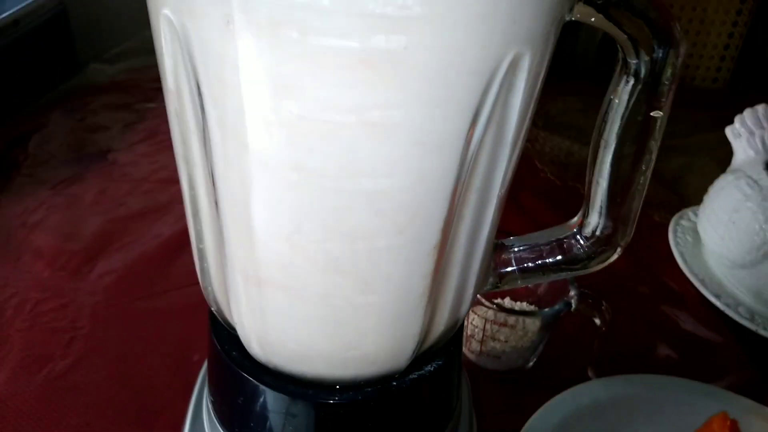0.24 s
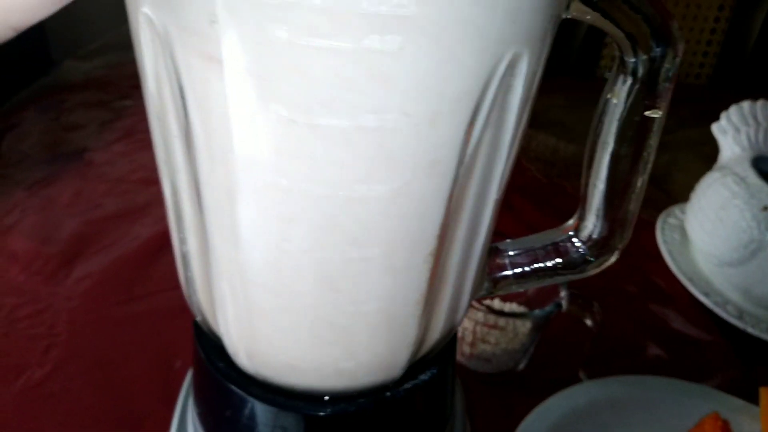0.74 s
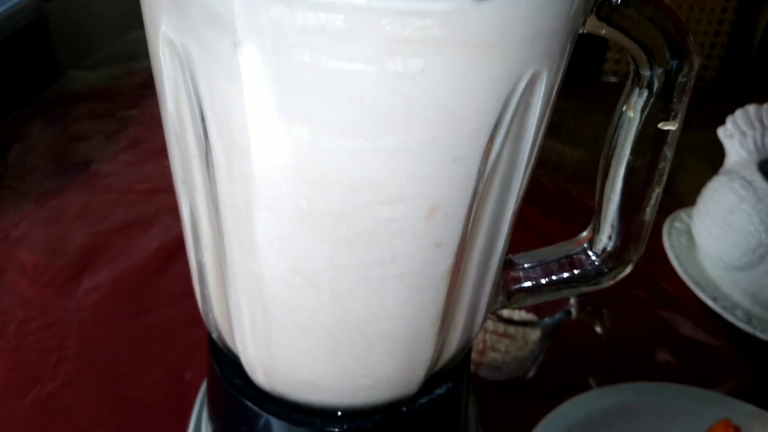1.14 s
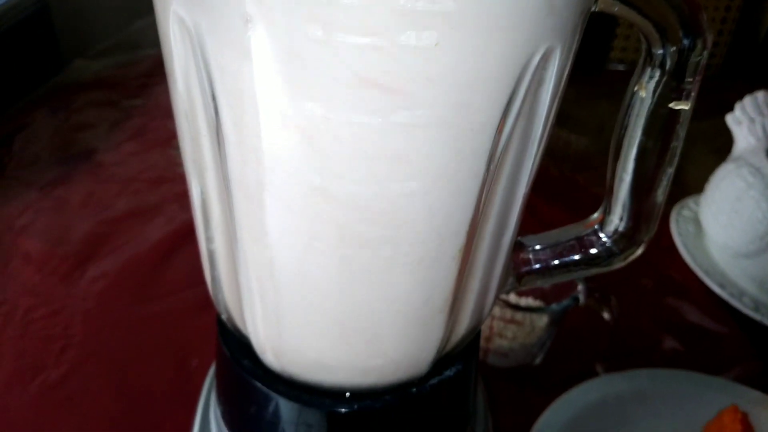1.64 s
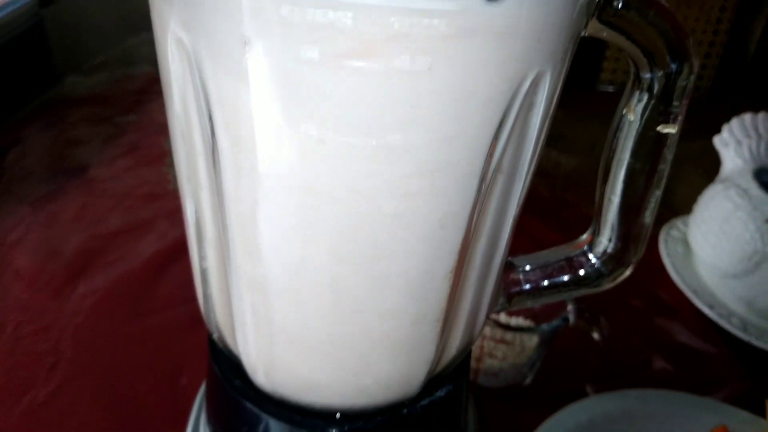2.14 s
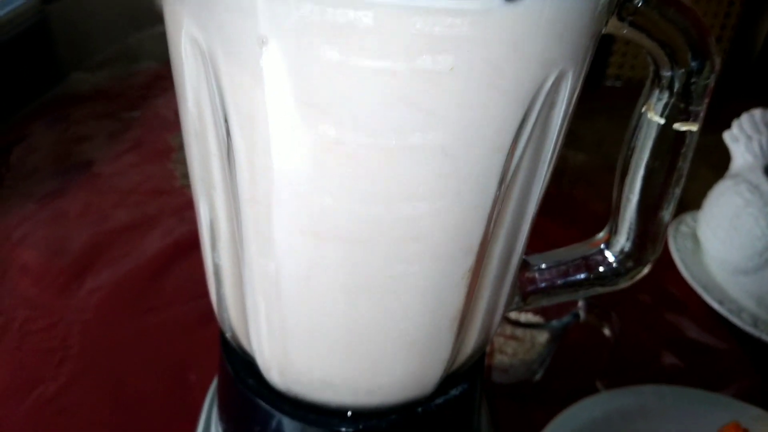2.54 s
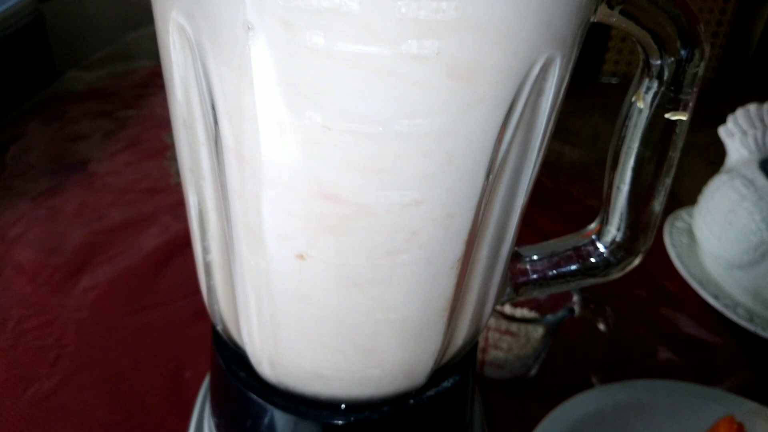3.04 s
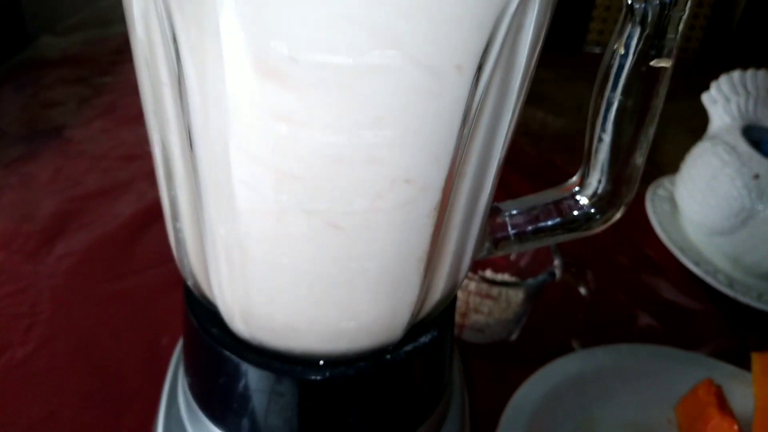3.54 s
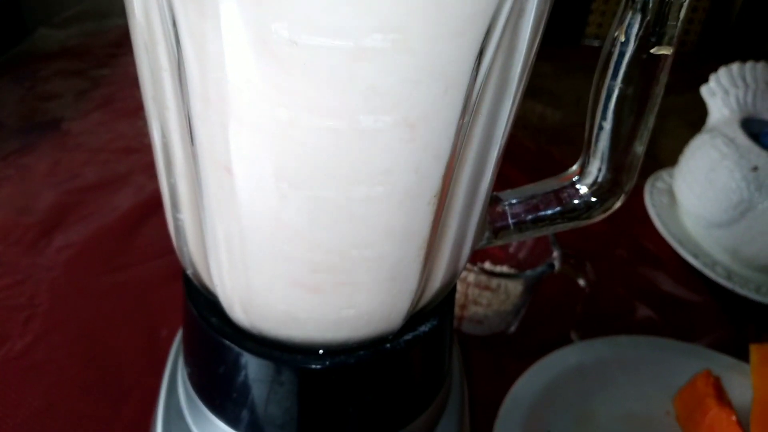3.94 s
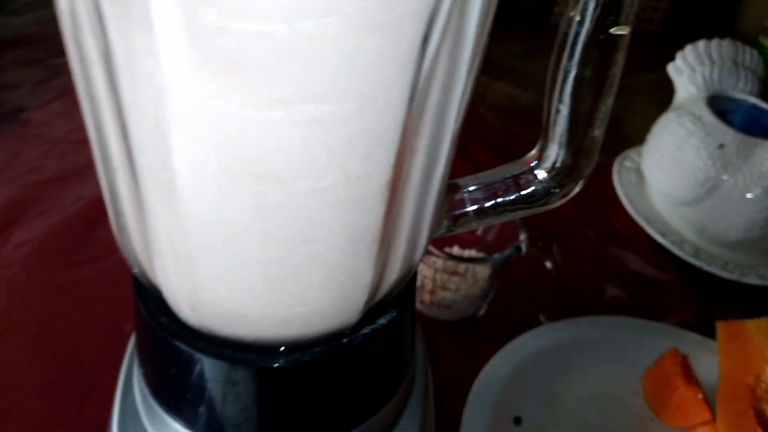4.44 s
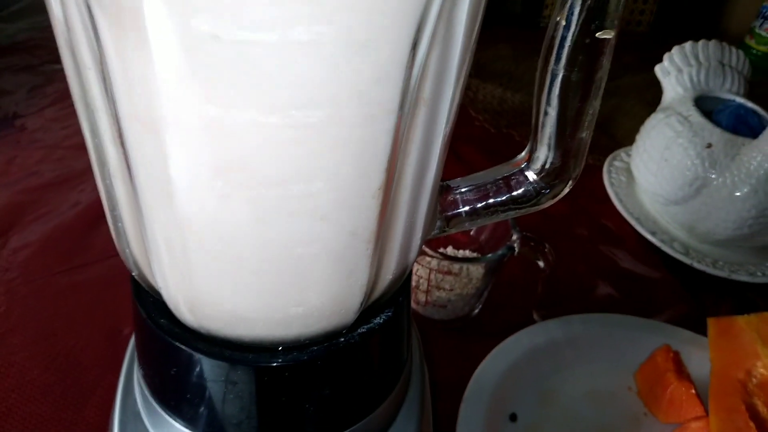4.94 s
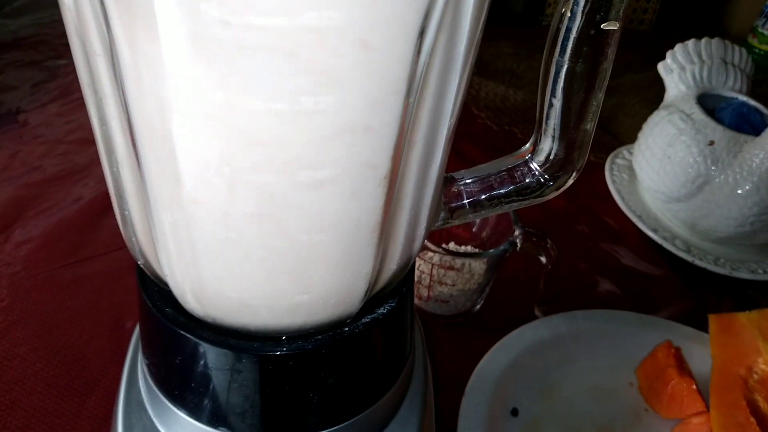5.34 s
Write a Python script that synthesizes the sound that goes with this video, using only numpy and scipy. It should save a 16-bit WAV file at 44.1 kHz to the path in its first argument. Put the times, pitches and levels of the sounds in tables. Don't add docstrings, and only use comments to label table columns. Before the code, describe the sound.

A blender with a thick glass jar, heard in stereo at close range with a short hard-walled room tail. It opens loud and rattling, ice crunching and the lid knocking left. After about one second it settles into bright hissing grind, a low motor hum that sags and recovers under load, low table rumble, wet gulps and isolated sharp cracks.

```python
import sys
import numpy as np
from scipy import signal
from scipy.fft import rfft, irfft, next_fast_len
from scipy.io import wavfile
from scipy.ndimage import uniform_filter1d

SR = 44100
rng = np.random.default_rng(int(sys.argv[2]) if len(sys.argv) > 2 else 0)


def convert_level_to_amplitude(level_db):
    exponent = np.asarray(level_db, float) / 20
    return 10 ** exponent


def int16_out(signal):
    q = np.round(np.clip(np.atleast_2d(signal).T, -1, 1) * 32767)
    wavfile.write(sys.argv[1], SR, q.astype(np.int16))


N = 246519
TIME = np.arange(N) / SR
HZ = np.fft.rfftfreq(2 * next_fast_len(N // 2 + SR // 20), 1 / SR)
SIDES = np.array([[.5], [-.5]])
LEFT_LAG_S = 0.00013
MAINS_BUZZ_HZ = 120

# t/s, shaft speed f/Hz, hum level/dB
MOTOR = [(0.0, 195.8, -48.5), (0.97, 194.9, -53), (1.07, 199.9, -52), (1.45, 200.5, -44), (2.0, 202.8, -45),
         (2.32, 204.6, -41.5), (2.42, 201.4, -35.5), (2.52, 199.2, -49), (2.9, 199.3, -49),
         (3.3, 203.3, -44), (3.95, 204.2, -45), (4.1, 202.7, -45.5), (4.4, 201.1, -46.5),
         (4.5, 200.3, -45.5), (5.05, 201.6, -46.5), (5.17, 204.8, -45), (5.25, 200.5, -44),
         (5.59, 202.6, -49)]


def level(x, db):
    return x * convert_level_to_amplitude(db) / np.sqrt(np.mean(x ** 2))


def along(rows, column=1):
    rows = np.array(rows, float)
    return np.interp(TIME, rows[:, 0], rows[:, column])


def on_hz(points, column=1):
    points = np.array(points, float)
    return np.interp(np.log(HZ + 1), np.log(points[:, 0]), points[:, column])


def walk(rate):
    hold = int(SR / rate)
    steps = np.repeat(rng.standard_normal(N // hold + 1), hold)[:N]
    return 1.64 * uniform_filter1d(uniform_filter1d(steps, hold), hold)


def above(hz):
    return 1 / np.sqrt(1 + (hz / (HZ + 1)) ** 16)


def below(hz):
    return np.sqrt(1 - above(hz) ** 2)


def bell(hz, width_hz):
    return 1 / (1 + 1j * (HZ ** 2 - hz ** 2) / (HZ + 1) / width_hz)


def bells(modes):
    return np.sqrt(sum(convert_level_to_amplitude(db) ** 2 * abs(bell(hz, width)) ** 4 for hz, width, db in modes))


def ports(envelope, colour, clicks=0):
    # f/Hz, share/0-1
    likeness = [(100, 0.78), (300, 0.84), (900, 0.88), (1600, 0.55), (3000, 0.6), (6300, 0.1), (7600, 0.94),
                (10500, 1), (15000, 0.72)]
    size = 2 * (len(HZ) - 1)
    shared, left, right = rfft(envelope * rng.standard_normal((3, N)) + 1.02 * clicks, size)
    alike = np.clip(on_hz(likeness), 0, 1)
    lag = np.exp(-2j * np.pi * HZ * LEFT_LAG_S * below(6600))
    left = (np.sqrt(alike) * shared + np.sqrt(1 - alike) * left) * lag
    right = np.sqrt(alike) * shared + np.sqrt(1 - alike) * right
    colour = colour / np.sqrt(np.mean(abs(colour) ** 2))
    return irfft(np.array([left, right]) * colour, size)[:, :N]


def clogging(column):
    # t/s at the worst, sag f/Hz, build-up t/s, hum loss level/dB
    clogs = [(0.36, 3.06, 0.077, 10), (0.46, 4.5, 0.12, 3.5), (0.55, 2.03, 0.088, 8), (0.9, 0.3, 0.1, 8),
             (1.3, 3.96, 0.19, 9.5), (1.64, 6.74, 0.14, 14), (1.92, 2.12, 0.08, 1), (2.16, 4.64, 0.15, 4),
             (2.7, 2.94, 0.1193, 3.5), (3.13, 4.96, 0.21, 6), (3.65, 5.4, 0.29, 3.5), (4.73, 1.84, 0.21, 2),
             (5.4, 4.25, 0.13, 3)]
    clears_s = 0.12
    return sum(np.interp(TIME, [row[0] - row[2], row[0], row[0] + clears_s], [0, row[column], 0])
               for row in clogs)


def shaft_speed():
    return along(MOTOR) - clogging(column=1)


def shaft_hum(hz, turn):
    # multiple of the shaft speed, level/dB under the usual hum
    orders = [(2, -18.5), (3, -15.5), (5, -19.5), (6, -14.5)]
    hum_db = along(MOTOR, column=2) - clogging(column=3)
    loudness = convert_level_to_amplitude(hum_db + 3.5 + 0.88 * walk(40) + 4.0 * walk(2.94) * SIDES)
    hum = loudness * np.sin(turn + (.5 + 0.3 * walk(3.72)) * SIDES)
    for order, db in orders:
        overtone = convert_level_to_amplitude(-44.5 + db + 1.0 * (hz - 200.0) + 0.92 * walk(5))
        hum = hum + overtone * np.sin(order * turn - 0.38 * SIDES)
    return hum


def squeal():
    # t/s, length t/s, level/dB
    start, length, db = (.445, .044, -34)
    gate = uniform_filter1d(1. * (abs(TIME - start - length / 2) < length / 2), size=200)
    end = start + length
    gate = np.maximum(gate, .4 * np.exp(-abs(TIME - end) / .08) * (TIME > end))
    return gate * convert_level_to_amplitude(db + np.array([[0], [-14]]))


def armature_whine(hz, turn):
    best_hz, fall_db_per_hz2 = 198.5, 0.17
    whine_db = np.maximum(-49.5 - fall_db_per_hz2 * (hz - best_hz) ** 2, -57)
    whine = convert_level_to_amplitude(whine_db + 6 + 1.2 * walk(26) + 3.7 * SIDES) + squeal()
    slots = 12 * turn - 1.6 * SIDES
    shadow = convert_level_to_amplitude(-11) * np.sin(slots - 2 * np.pi * MAINS_BUZZ_HZ * TIME)
    return whine * (np.sin(slots) + shadow)


def motor():
    hz = shaft_speed()
    turn = 2 * np.pi * np.cumsum(hz * (1 + .001 * walk(40))) / SR
    return shaft_hum(hz, turn) + armature_whine(hz, turn)


def table():
    # t/s, level/dB
    rocking = [
        (0.0, 3),
        (0.5, -2),
        (0.95, 8),
        (1.1, 0),
        (1.55, -2),
        (1.8, 4),
        (2.2, 6.5),
        (2.5, -1.5),
        (5.59, -3.5),
    ]
    # f/Hz, level/dB
    rumble_colour = [(33, -46), (45, -13), (85, -2.5), (135, -12.5), (170, -5.5), (230, -47)]
    # f/Hz, level/dB
    pulp_colour = [(130, -20), (200, -4), (290, 1.5), (400, -7), (540, -15), (700, -28)]
    rocking_db = along(rocking)
    both = np.ones((2, 1))
    rumble = convert_level_to_amplitude(-65 + rocking_db + 1.4 * walk(5.96))
    gurgle = convert_level_to_amplitude(-52.5 + 0.25 * rocking_db + 1.66 * walk(24.61))
    return ports(rumble, convert_level_to_amplitude(on_hz(rumble_colour)) * both) + ports(gurgle, convert_level_to_amplitude(on_hz(pulp_colour)) * both)


def gulps():
    # t/s, peak level/dB, pitch f/Hz
    pockets = [(0.113, -28.5, 364), (0.356, -50, 253), (0.492, -23.5, 363), (0.924, -47, 266),
               (1.077, -45, 300), (1.248, -29, 281.7), (1.301, -29.5, 354), (1.432, -30, 260),
               (1.5, -30, 280), (1.57, -31, 276), (1.76, -33, 240), (2.19, -27, 295), (2.336, -21.5, 293.3),
               (2.416, -28, 240), (2.737, -55, 294), (3.851, -47, 223.6), (4.202, -33, 231.5)]
    out = np.zeros((2, N))
    t = TIME[:SR // 10]
    for start, db, hz in pockets:
        i = int(start * SR)
        pitch = .85 * hz * (1 + 7.7 * t)
        swell = (t / 0.01) * np.exp(1 - t / 0.0062)
        gulp = convert_level_to_amplitude(db - 7.0) * np.sin(2 * np.pi * pitch * t) * swell
        out[:, i:i + len(t)] += gulp[:N - i]
    return out


def grit(rate, spread_db, tail_ms, bed):
    sizes = convert_level_to_amplitude(spread_db * np.minimum(rng.exponential(size=N), 3))
    ticks = (rng.random(N) < rate / SR) * sizes
    ticks = signal.lfilter([1], [1, -np.exp(-1000 / (tail_ms * SR))], ticks)
    return level(bed + level(ticks, 0), 0)


def crunches(rows, tail_ms, after_db, after_ms):
    power = np.zeros(N)
    for s, held_ms, db in rows:
        start = int(s * SR)
        ms = 1000 * TIME[:min(N - start, SR // 4)]
        late = np.maximum(ms - held_ms, 0)
        fall_ms = tail_ms * np.clip(held_ms / 8, .4, 1)
        shape = np.exp(-late / fall_ms) ** 2 + (convert_level_to_amplitude(after_db) * np.exp(-late / after_ms)) ** 2
        shape += (convert_level_to_amplitude(-7) * np.exp(-ms / 3.0)) ** 2
        power[start:start + len(ms)] += convert_level_to_amplitude(db) ** 2 * shape * np.minimum(ms / 2.9, 1) ** 2
    return np.sqrt(power)


def accents(rows, boost, rise_ms, fall_ms):
    power = np.ones(N)
    lead_s = .003
    ms = 1000 * (TIME[:SR // 100] - lead_s)
    shape = np.where(ms < 0, np.exp(-(ms / rise_ms) ** 2), np.exp(-ms / fall_ms))
    for s, db in rows:
        start = int((s - lead_s) * SR)
        power[start:start + len(ms)] += convert_level_to_amplitude(db + boost) ** 2 * shape
    return np.sqrt(power / uniform_filter1d(power, size=SR // 40))


def colours(column):
    # f/Hz, left level/dB, right level/dB
    jar_colour = [(540, -4.5, -5.5), (850, 2, 3), (1705, 3.5, 6.5), (2000, 1, -2), (3140, 6, 4.5),
                  (3970, 4.5, -3), (5470, -3.5, 3), (6570, 14, 9.5), (7800, 12, 11), (10680, 8.5, 12.5),
                  (11470, 2, -6.5), (12400, -3.5, 5), (16400, -10, -12)]
    # f/Hz, width f/Hz, grinding level/dB, struck level/dB
    glass_modes = [(874, 250, 0.5, 2), (1003, 29, 5, 7), (1665, 310, 3, 3.5), (2370, 160, -1, 5.5),
                   (3250, 190, 1.5, 6), (3563, 71, -1, 9.5), (4150, 310, 3.5, 6), (8045, 1240, 6.5, 13),
                   (9010, 1100, 4, 7)]
    # f/Hz, width f/Hz, level/dB
    lid_modes = [(5250, 660, 3.5), (5870, 570, 1.5), (7130, 820, -10)]
    glass = convert_level_to_amplitude(sum(mode[column] * abs(bell(*mode[:2])) ** 2 for mode in glass_modes))
    jar = convert_level_to_amplitude(np.array([on_hz(jar_colour, column=1), on_hz(jar_colour, column=2)])) * glass
    body = jar * above(404) * below(1980)
    wall = jar * above(2100) * below(4900)
    lid = bells(lid_modes) * above(4910) ** 2 * convert_level_to_amplitude(np.array([[0], [-24]]))
    fizz = jar * above(4800) * below(14000)
    return body, wall, lid, fizz, jar * above(11200)


def collar(surge, chatter, blades):
    # f/Hz, width f/Hz, level/dB
    collar_modes = [(4540, 390, -3), (4775, 560, 5)]
    buzz = convert_level_to_amplitude(-39.5) * convert_level_to_amplitude(.8 * surge) * chatter * blades
    return ports(buzz, bells(collar_modes) * convert_level_to_amplitude(np.array([[0], [-22]])))


def blows():
    # t/s, crunch length t/ms, level/dB,
    # bulk level/dB, brittleness level/dB
    ice = [(0.062, 26, -37.5, -3, 19.5), (0.0986, 25, -35.5, -6.5, 14.5), (0.121, 13, -33, -6, 10.5),
           (0.143, 5.2, -31.5, -10, -1), (0.215, 7.5, -33.5, -7.5, -5), (0.2423, 2.6, -34.5, -4, -4),
           (0.348, 12, -40, -19, 6), (0.378, 20, -46, -17, 11.5), (0.4848, 17, -37.5, -8, 15),
           (0.5691, 10.5, -40.5, -20, 3), (0.595, 7.4, -39, -3.5, 17.5), (0.614, 6.6, -38.5, -2.5, 12),
           (0.682, 13, -48, -7, 9), (0.755, 8.1, -33.5, -10, 1), (0.823, 21.5, -35, -9.5, 6.5),
           (0.8864, 9.9, -41, -4, 8.5), (0.906, 3.3, -33, -9.5, 7), (0.911, 7.3, -29, -8.5, 6),
           (0.966, 16, -31, -8, 5), (1.234, 25.3, -40, -3, 15), (1.6322, 15, -29.5, -3, 11),
           (1.652, 20, -46, -1, 17),
           (1.7529, 14, -49, -9, 10), (1.803, 4.5, -55, -1, 18.5), (1.908, 7.5, -42.5, -2, 5),
              (2.142, 17.3, -47, 1, 13), (2.389, 10, -47.5, 3, 0), (2.4254, 11, -38, -7, 5),
              (2.4862, 5.6, -34.5, -17, -10), (2.6722, 7.5, -42.5, -1, 0), (2.9524, 4.5, -42.5, 1, 14),
              (3.357, 18.7, -41.5, -2, 2), (3.385, 6.7, -35.5, 1, 9), (3.405, 18, -42, -8, 3),
              (3.52, 8.8, -41, -21, 5.5), (3.88, 4.5, -41, 1.5, 8.5), (4.098, 6.3, -36.5, 1, 1),
              (4.3707, 4.6, -30.5, -1, 4.5), (4.5781, 5.4, -40.5, -8, 7.5), (4.705, 3.44, -37.5, -3, 1),
              (4.824, 6.7, -39.5, -2, 12.5), (4.839, 4, -40, -3, 8), (4.912, 2.4, -35.5, -13, 7),
              (4.965, 20, -43, -1.5, 7.5), (5.1697, 5.15, -43.5, -6.5, 8), (5.39, 3.2, -41, -7, 2)]
    # t/s, length t/ms, level/dB
    knocks = [(0.0622, 16, -19.5), (0.1002, 23.5, -19), (0.126, 10, -18), (0.14, 2.5, -24),
              (0.155, 1.5, -15), (0.242, 2.8, -22), (0.268, 19, -22.5), (0.3042, 3.5, -27), (0.34, 15, -18),
              (0.375, 2, -11), (0.395, 12, -24), (0.436, 18, -24), (0.483, 14, -12), (0.5691, 9.6, -26),
              (0.595, 10, -15), (0.613, 6.1, -12.5), (0.681, 13, -24.5), (0.722, 31, -28.5),
              (0.745, 13, -18.5), (0.757, 4.6, -13), (0.82, 21, -24), (1.803, 4.5, -36), (1.9848, 3, -35),
              (2.024, 6.5, -29.5), (2.363, 4.7, -29.5), (3.132, 8.7, -30.5), (3.244, 9.2, -29.5),
              (3.7065, 5, -38), (4.027, 5, -28.5), (4.2096, 8.4, -28), (4.7049, 3.35, -27),
              (4.9126, 2.4, -21.5)]
    s, ms, db, bulk_db, brittle_db = np.transpose(ice)
    body = np.transpose([s, ms, db + bulk_db])
    wall = np.transpose([s, ms, db])
    lid = np.transpose([s, ms, db + brittle_db - 1])
    fizz = np.transpose([s, ms, db + brittle_db])
    return body, wall, np.vstack([lid, knocks]), fizz


def tapped(chatter):
    # t/s, level/dB over the chatter
    rim_taps = [(0.0656, 4.7), (0.0718, 0), (0.077, 9), (0.0846, 2.1), (0.096, 2.1), (0.1084, 1),
                (0.1291, 1), (0.1413, 4.3), (0.1471, 8), (0.1572, 11), (0.1616, 6), (0.1756, 4.1),
                (0.1859, 4), (0.192, 5.1), (0.2033, 1), (0.2441, 6.5), (0.2533, 4.1), (0.273, 4.0),
                (0.2792, 3.9), (0.2844, -1), (0.2954, 1), (0.3058, 5.1), (0.3203, -2), (0.3254, 2.9),
                (0.3346, 2.6), (0.3423, 3.7), (0.3512, 3.8), (0.3637, 1), (0.3791, 8.5), (0.3929, 1.6),
                (0.4047, 5.3), (0.4099, 1.6), (0.4253, 4.6), (0.4399, 4.6), (0.4528, 6), (0.4862, 6),
                (0.4898, 3.4), (0.4946, -1), (0.4993, 3.5), (0.5163, 1), (0.5246, -1), (0.5342, 4.9),
                (0.5706, 8), (0.5783, 5.4), (0.6011, 3.5), (0.6178, 10.5), (0.6296, 2.9), (0.6448, 3.8),
                (0.6706, 9), (0.6857, 2.3), (0.6944, 3.5), (0.727, 3.8), (0.7447, 5), (0.7555, 6),
                (0.7626, 4), (0.7886, 9), (0.8267, 3.2), (0.8336, 2), (0.9186, 3), (0.9723, 6),
                (1.11, 6.8), (1.1428, 6.5), (1.158, 6.8), (1.2367, 2), (1.2404, 3.2), (1.2528, 2.9),
                 (1.2625, 4.4), (1.344, 6.1), (1.55, 6.6), (1.561, 5.5), (1.587, 5.5), (1.637, 5.2),
                 (1.6426, 3.2), (1.6445, 2.2), (1.653, 3.6), (1.6707, 5.6), (1.7545, 8.2), (1.7872, 5.6),
                 (1.806, 6.5), (2.0266, 4.9), (2.0684, 7.5), (2.2488, 8.1), (2.367, 5.3), (2.3918, 5.6),
                 (2.6739, 7), (2.7929, 6.6), (2.9554, 6.8), (3.0728, 6.9), (3.139, 5.4), (3.1915, 7.1),
                 (3.2582, 5.8), (3.3874, 5.7), (3.4105, 6.8), (3.883, 6.0), (4.0329, 5.6), (4.213, 4.6),
                 (4.2181, 4.4), (4.2604, 4.7), (4.3073, 7.8), (4.3766, 5.8), (4.4142, 5.4), (4.7083, 6.3),
                 (4.7864, 6.6), (4.828, 4.4), (4.9163, 6.6), (4.9761, 6.6), (5.014, 10.4), (5.1532, 6),
                 (5.1728, 5.3), (5.3926, 7.1)]
    s, db = np.transpose(rim_taps)
    tap_ms = 0.89
    clicks = np.zeros(N)
    clicks[(s * SR).astype(int)] = convert_level_to_amplitude(db) * np.sqrt(tap_ms * SR / 1000)
    thin = np.sqrt(np.clip(1 - uniform_filter1d(clicks ** 2, size=SR // 50), .15, 1))
    around = np.sqrt(np.maximum(uniform_filter1d(chatter ** 2, size=SR // 50), 0))
    return clicks * around, thin


def grind(db, surge):
    return convert_level_to_amplitude(db + 1.06 * surge + 0.97 * walk(16))


def smash(rows, db):
    return convert_level_to_amplitude(db) * crunches(rows, tail_ms=8.3, after_db=-8.5, after_ms=40)


def air(surge, fizz_blows, splinters, shards):
    # t/s, peak level/dB, length t/ms
    ice_snaps = [(0.0757, -11, 8.5), (0.4828, -40, 8.5), (0.595, -34, 8.5), (0.6145, -24, 9),
                 (0.7607, -38, 7.3), (0.8235, -29, 8.5), (0.9163, -19, 8.5), (0.9512, -23, 9.2),
                 (0.9692, -34, 8.5), (1.635, -3, 10), (2.8549, -30, 8.5), (3.3872, -38, 8.5),
                 (3.4092, -31, 8.3), (4.3715, -19, 4.8), (4.8267, -37, 7.1), (5.011, -37, 7.8)]
    hiss = convert_level_to_amplitude(-48 + 0.39 * surge + 1.0 * walk(12)) * grit(rate=500, spread_db=5.5, tail_ms=.8, bed=1.1)
    snaps = crunches(np.array(ice_snaps)[:, [0, 2, 1]], tail_ms=8.4, after_db=-20, after_ms=24)
    return hiss + (convert_level_to_amplitude(-29) * fizz_blows + convert_level_to_amplitude(-15.5) * snaps * splinters) * shards


def rattle():
    # t/s, extra chatter level/dB
    looseness = [(0.0, 8), (0.12, 9), (0.24, 9), (0.34, 14), (0.48, 9.5), (0.74, 6), (0.84, 2), (0.98, 4),
                 (1.2, 0), (1.5, 2.5), (2.1, 1.5), (2.45, -2.5), (2.8, 0), (3.2, 0.5), (4.2, 2), (5.1, 0),
                 (5.59, 2)]
    # t/s, level/dB over the
    shard_cracks = [(0.0503, 7), (0.0771, 4.4), (0.0806, 5), (0.102, 8), (0.1124, 0), (0.1292, 3.5),
                    (0.1364, -2), (0.1524, 7), (0.1572, 3.9), (0.1772, 3.1), (0.1957, 7), (0.217, 6.9),
                    (0.2434, 11), (0.2738, 9), (0.3052, 6.4), (0.351, 14), (0.3574, 3.0), (0.3669, 3.0),
                    (0.3795, 4.2), (0.393, 10), (0.404, 3.1), (0.4083, 2.3), (0.4247, 2.4), (0.4295, 3.7),
                    (0.4415, 2.7), (0.4457, 4.9), (0.4516, 7), (0.4572, 4), (0.4606, 2.4), (0.4842, 4.9),
                    (0.4959, 6), (0.5193, 5), (0.5317, 3.3), (0.5417, 3.8), (0.5714, 4.0), (0.5762, 5.4),
                    (0.5987, 7.0), (0.6166, 13), (0.633, 6), (0.6431, 4.0), (0.6949, 13), (0.7558, 2.9),
                    (0.7632, 6.9), (0.7813, 7), (0.792, 7), (0.8277, 2), (0.8388, 2.6), (0.8455, 11),
                    (0.8607, 0), (0.8691, 4.5), (0.8889, 4.5), (0.8965, 1), (0.9136, 6), (0.9254, 2.0),
                    (0.9428, 0), (0.9542, 3), (0.9696, 3), (0.9886, 4), (0.9995, 2.7), (1.063, 8),
                    (1.1436, 5.1), (1.242, 2.8), (1.251, 5.3), (1.2663, 2.9), (1.292, 4.3), (1.4075, 6.7),
                   (1.6352, 4.8), (1.6467, 3.3), (1.6703, 3.9), (1.6868, 4.1), (1.7049, 3.5), (1.7548, 4.4),
                   (1.765, 4.6), (1.8057, 6.4), (1.9101, 5.9), (2.0254, 4.9), (2.0683, 5.5), (2.1557, 5.4),
                   (2.4019, 6.3), (2.4267, 3.7), (2.4315, 2.5), (2.4922, 6.7), (2.9552, 7.5), (2.9614, 2.1),
                   (2.9768, 6.3), (3.0173, 6.5), (3.0859, 7.1), (3.3745, 4.5), (3.389, 6.6), (3.4035, 2.9),
                   (3.4117, 3.3), (3.4151, 2.0), (3.4297, 3.6), (3.5243, 4.4), (3.6142, 4.4), (3.8831, 5.7),
                   (4.046, 5.5), (4.103, 4.2), (4.2431, 6.1), (4.2608, 4.55), (4.3726, 4), (4.3894, 3.0),
                   (4.575, 4.1), (4.582, 5.1), (4.6081, 4.9), (4.7083, 5.5), (4.8278, 6.6), (4.832, 3.9),
                   (4.8413, 2.9), (4.9149, 7.8), (4.9304, 4.1), (4.965, 4.8), (4.9761, 3.1), (4.983, 3.1),
                   (5.014, 5.45), (5.1734, 6.1), (5.3169, 6), (5.3935, 7), (5.4974, 4.9), (5.5226, 5.3)]
    hz, loose_db = shaft_speed(), along(looseness)
    load_db = 0.1457 * (200.5 - hz)
    surge = .7 * walk(9) + .6 * np.sin(2 * np.pi * MAINS_BUZZ_HZ * TIME)
    fine = grit(rate=600, spread_db=-0.5, tail_ms=0.84, bed=2.7)
    splinters = grit(rate=900, spread_db=2, tail_ms=0.7, bed=2.5)
    chatter = grit(rate=600, spread_db=2.6, tail_ms=0.65, bed=1.0)
    turn = 2 * np.pi * np.cumsum(hz) / SR
    blades, shaft = convert_level_to_amplitude(3.5 * np.sin(2 * turn)), convert_level_to_amplitude(1.5 * np.sin(turn))
    shards = shaft * accents(shard_cracks, boost=0.23, rise_ms=0.73, fall_ms=0.61)
    softs, hards = colours(column=2), colours(column=3)
    body_rows, wall_rows, lid_rows, fizz_rows = blows()
    out = collar(surge, chatter, blades)

    out += ports(grind(-45 + load_db, surge) * fine * shaft, softs[0])
    out += ports(smash(body_rows, 1.5) * splinters * shaft, hards[0])

    out += ports(grind(-40.5 + load_db, surge) * fine * shards, softs[1])
    out += ports(smash(wall_rows, 5.65) * splinters * shards, hards[1])

    lid_grind, lid_blows = grind(-38 + loose_db, surge), smash(lid_rows, -1.0)
    clicks, thin = tapped(np.hypot(lid_grind, lid_blows))
    out += ports(lid_grind * chatter * blades * thin, softs[2], clicks)
    out += ports(lid_blows * splinters * blades * thin, hards[2])

    out += ports(grind(-40.5 + 0.095 * loose_db + load_db, surge) * fine * shards, softs[3])
    out += ports(smash(fizz_rows, 2.1) * splinters * shards, hards[3])
    return out + ports(air(surge, smash(fizz_rows, 0), splinters, shards), softs[4])


def rings(rise_s):
    # t/s, f/Hz, level/dB
    tones = [(.492, 700, -35), (.493, 900, -36), (.524, 740, -39), (.51, 370, -37), (.616, 880, -35),
             (.614, 210, -35), (2.488, 3700, -33), (.968, 1660, -36), (.918, 3500, -29), (.978, 3600, -29),
             (1.636, 870, -30), (1.636, 1010, -32), (1.636, 1620, -35), (4.372, 980, -30),
             (4.372, 1570, -27), (4.372, 3200, -26), (4.372, 3550, -28), (4.826, 1450, -34),
             (4.826, 3250, -31), (4.826, 4120, -31), (4.918, 1020, -35), (2.432, 2900, -35),
             (2.489, 3200, -33)]
    out = np.zeros((2, N))
    t = TIME[:SR // 20]
    for s, hz, db in tones:
        i = int(s * SR)
        phase = 2 * np.pi * hz * (t - np.array([[LEFT_LAG_S / 2], [0]]))
        out[:, i:i + len(t)] += convert_level_to_amplitude(db) * np.sin(phase) * (t / rise_s) * np.exp(1 - t / rise_s)
    return out


def kitchen(x, t60_s, wet_db):
    t = TIME[:SR // 2]
    tail = rng.standard_normal((2, len(t))) * np.exp(-np.log(1000) * t / t60_s) * (t > .004)
    tail = tail / np.sqrt(np.sum(tail ** 2, axis=1, keepdims=True))
    return convert_level_to_amplitude(wet_db) * signal.fftconvolve(x, tail, axes=1)[:, :N]


def scene():
    jar = rattle() + rings(rise_s=.0045)
    return motor() + table() + gulps() + jar + kitchen(jar, t60_s=0.074, wet_db=-13.0)


def roll_off(x):
    return signal.sosfilt(signal.butter(12, 16480, fs=SR, output="sos"), x)


def record(dry):
    rounded = .8 * np.tanh(dry / .8)
    top_cut = signal.ellip(10, .3, 60, 15850, fs=SR, output="sos")
    return roll_off(signal.sosfilt(top_cut, rounded))


dry = scene()
out = record(dry)
int16_out(out)
```